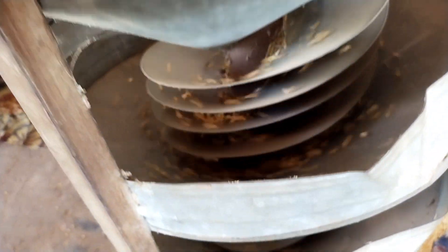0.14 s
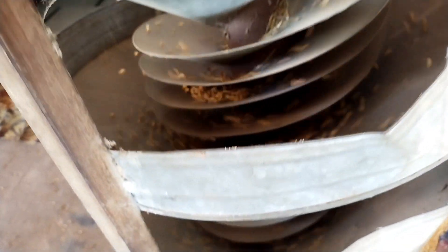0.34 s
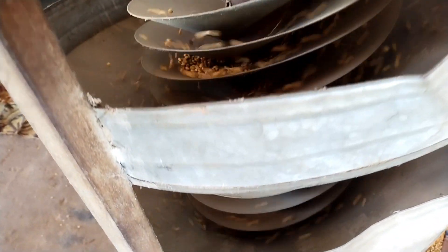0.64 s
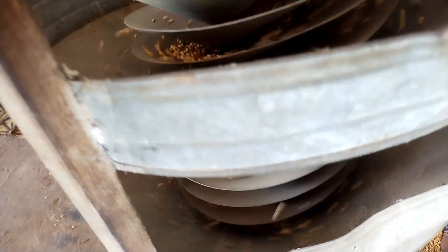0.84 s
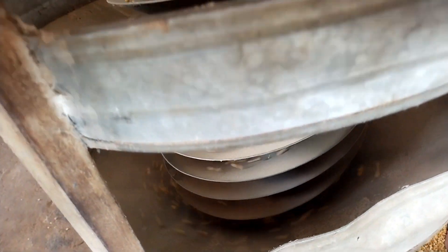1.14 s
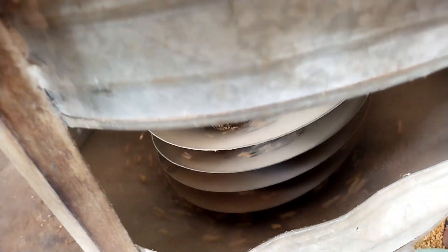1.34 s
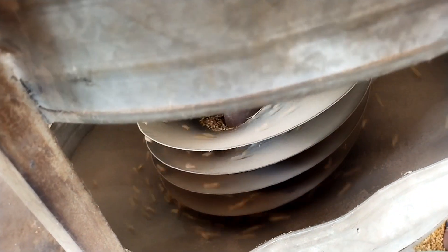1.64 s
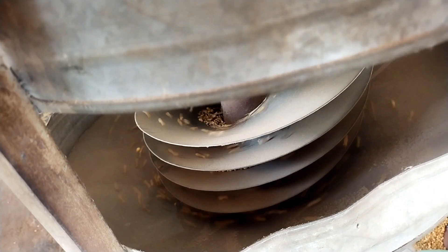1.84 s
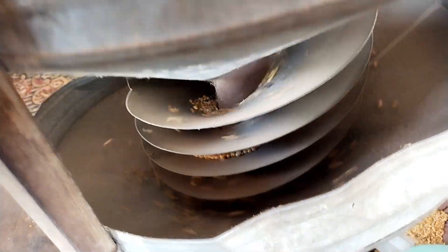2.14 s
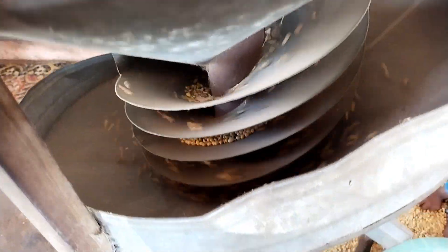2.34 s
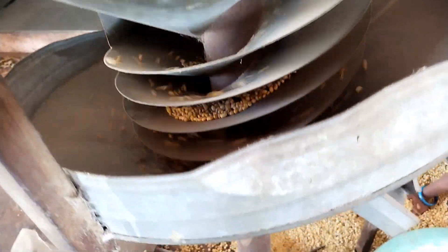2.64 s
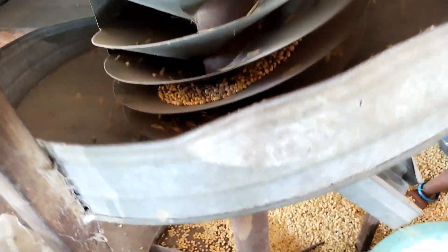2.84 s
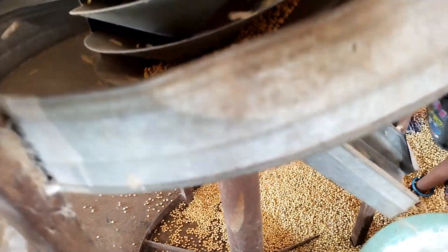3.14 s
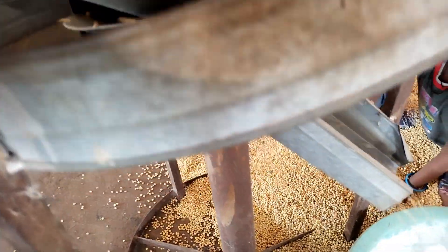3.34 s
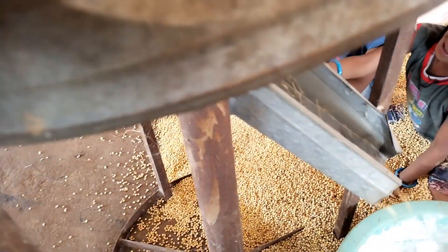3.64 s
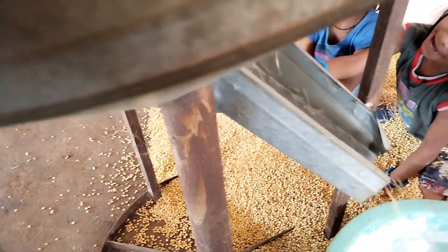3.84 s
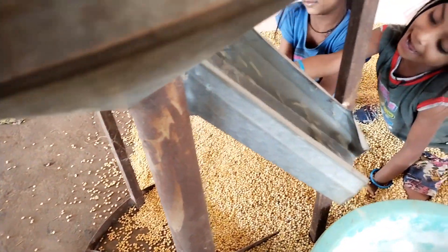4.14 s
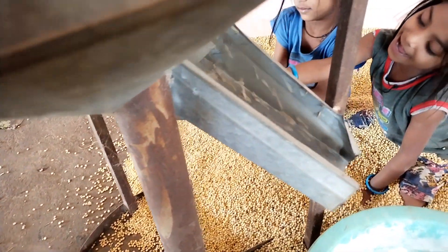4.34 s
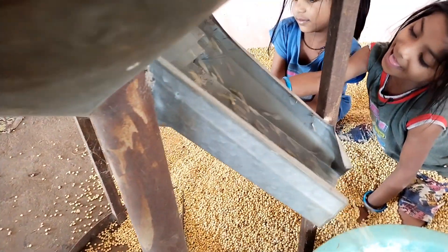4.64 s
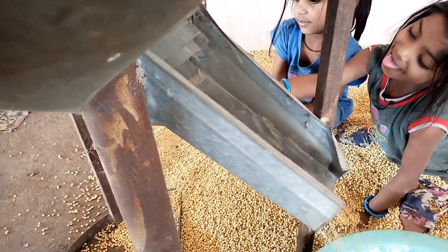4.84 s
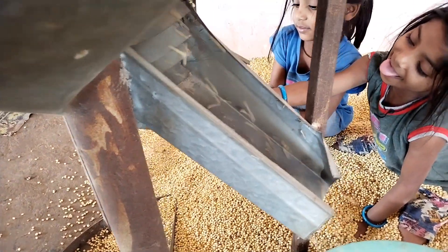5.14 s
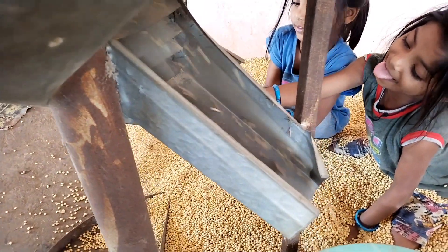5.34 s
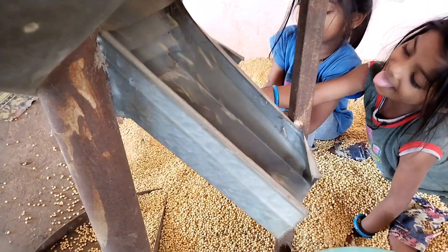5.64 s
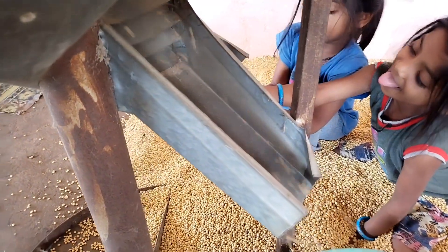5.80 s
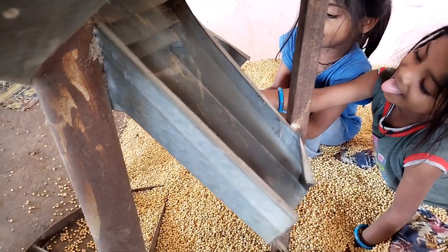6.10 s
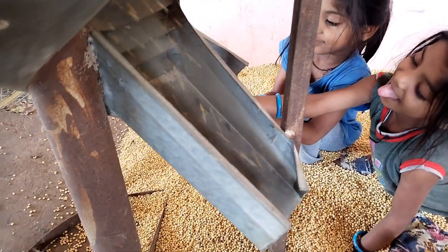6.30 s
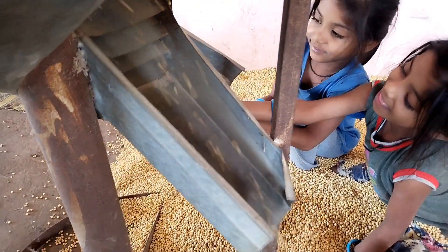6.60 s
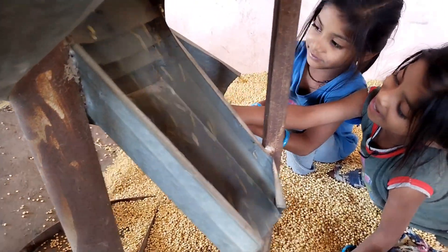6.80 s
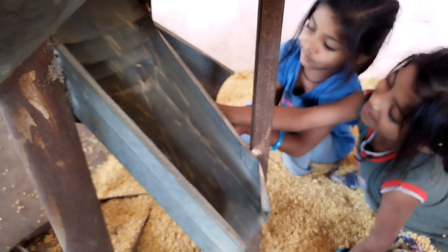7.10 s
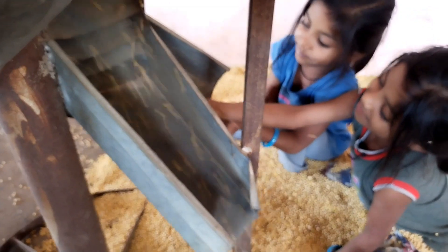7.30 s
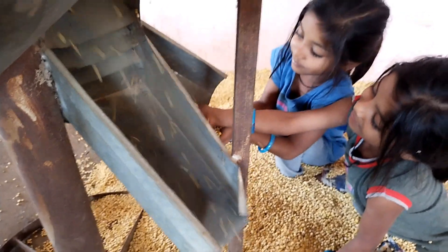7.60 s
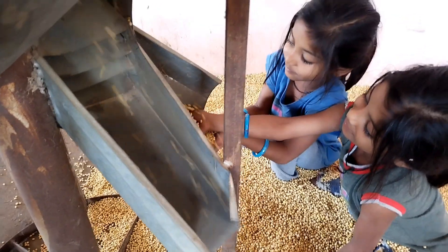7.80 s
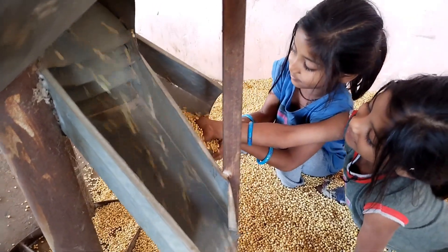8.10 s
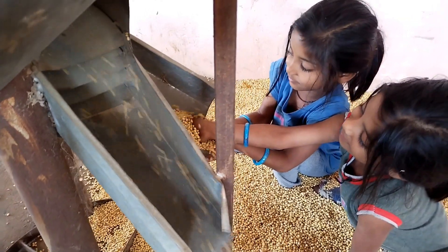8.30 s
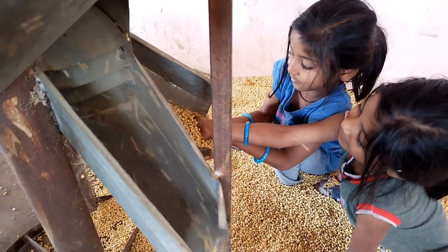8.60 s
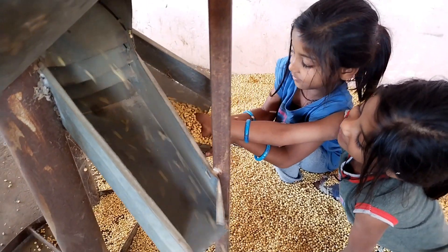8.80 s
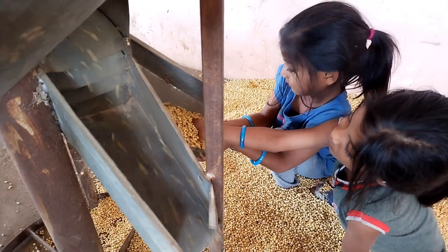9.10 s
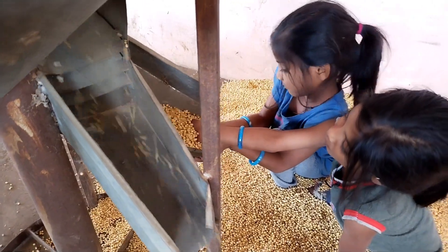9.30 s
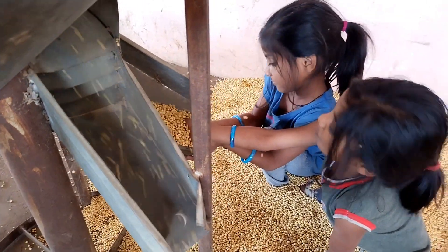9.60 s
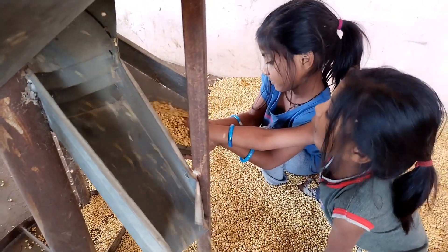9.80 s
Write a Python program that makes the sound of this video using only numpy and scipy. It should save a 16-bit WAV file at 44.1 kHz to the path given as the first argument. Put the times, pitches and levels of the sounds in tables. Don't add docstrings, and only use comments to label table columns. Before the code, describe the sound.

A constant hail of hard beans on thin metal, heard close up on a handheld phone. It starts on the spiral plates, with several isolated cracks in the first seconds, passes the more ringing drum wall with faint singing edges around the middle, and ends at the chute with a drier sliding rush. A low drum hum swells and fades beneath. The flow never stops.

```python
import sys
import numpy as np
from scipy import signal
from scipy.fft import rfft, irfft, next_fast_len
from scipy.io import wavfile
from scipy.ndimage import uniform_filter1d

SR = 44100
rng = np.random.default_rng(int(sys.argv[2]) if len(sys.argv) > 2 else 0)


def makeup_ratio(level_db):
    decades = np.asarray(level_db, float) / 20
    return 10 ** decades


def store_wav(level_fs):
    pcm = np.round(np.clip(np.atleast_2d(level_fs), -1, 1) * 32767)
    wavfile.write(sys.argv[1], SR, pcm.T.astype(np.int16))


N = 438785


def set_rms(x, db):
    return x * makeup_ratio(db) / np.sqrt(np.mean(x ** 2))


def wander(rate_hz):
    hold = int(SR / rate_hz)
    steps = np.repeat(rng.standard_normal(N // hold + 1), hold)
    return 1.3 * uniform_filter1d(uniform_filter1d(steps, hold), hold)[:N]


def curves(table):
    t_s, *columns = np.transpose(table)
    return [np.interp(np.arange(N) / SR, t_s, column) for column in columns]


def band(x, low_hz, high_hz, order=2):
    sos = signal.butter(order, [low_hz, high_hz], "band", fs=SR, output="sos")
    return signal.sosfiltfilt(sos, x)


def bean_blows(per_s, spread_db):
    lands = rng.random(N) < per_s / SR
    hardness = np.minimum(rng.exponential(size=N), 5)
    sign = np.sign(rng.random(N) - .5)
    return lands * makeup_ratio(spread_db * hardness) * sign


# f/Hz, level/dB per Hz
BEAN_COLOUR = [(25, -47.5), (130, -25.5), (190, -22), (270, -12.5), (460, -13), (900, -6), (1350, -2.5),
               (2500, -3), (2950, -5.5), (4450, -7), (4900, -11.5), (6200, -13), (9500, -24), (15500, -30)]


def sheet(resonances, per_s, t60_s, ring_db=-3, spots=10):
    size = next_fast_len(N + SR // 2)
    t = np.arange(SR // 2) / SR
    spectrum = 0
    for _ in range(spots):
        ring = rng.standard_normal(len(t)) * np.exp(-np.log(1000) * t / t60_s)
        ring *= makeup_ratio(ring_db) / np.sqrt(np.sum(ring ** 2))
        ring[0] = 1
        stream = bean_blows(per_s / spots, spread_db=1.5) * makeup_ratio(.6 * wander(14))
        spectrum = spectrum + rfft(stream, size) * rfft(ring, size)
    hz = np.maximum(np.arange(len(spectrum)) * SR / size, 1)
    colour_hz, colour_db = np.transpose(BEAN_COLOUR)
    db = np.interp(np.log(hz), np.log(colour_hz), colour_db)
    for f_hz, width_hz, lift_db in resonances:
        db = db + lift_db / (1 + (2 * (hz - f_hz) / width_hz) ** 2)
    return set_rms(irfft(spectrum * makeup_ratio(db), size)[:N], 0)


# f/Hz, width/Hz, lift/dB
SPIRAL_MODES = [(232, 44, -4.5), (300, 35, -1), (392, 34, 4.5), (618, 50, 5), (716, 60, -3), (1290, 96, 1),
                (1420, 110, 2), (1650, 160, 2), (1940, 300, -0.2), (5100, 1000, 1), (7560, 1660, 9.5),
                (8550, 1400, 1.5)]


def spiral():
    return sheet(SPIRAL_MODES, per_s=14000, t60_s=0.15)


# f/Hz, width/Hz, lift/dB
WALL_MODES = [(185, 43, -3), (235, 20, -2), (293, 56, 0.5), (391, 23, 4.5), (634, 46, 4.5), (1020, 70, -2),
              (1470, 250, 2), (1870, 180, 0.5), (2150, 180, 2), (2490, 130, 1), (7500, 1430, 10.5),
              (8300, 1100, 1.2), (14500, 1500, -2.5)]


def wall():
    return sheet(WALL_MODES, per_s=14000, t60_s=0.2)


# f/Hz, width/Hz, lift/dB
CHUTE_MODES = [(185, 43, -5), (233, 20, -7), (298, 80, 1.5), (457, 31, -1), (503, 140, 2), (830, 150, 1.5),
               (1450, 130, 3), (1700, 560, -0.5), (2250, 180, 0), (2420, 200, 0), (3460, 510, 1.2),
               (6740, 830, 3.5), (7510, 1070, 8.5), (8400, 1100, 3)]


def chute():
    return sheet(CHUTE_MODES, per_s=11000, t60_s=0.11)


# low/Hz, high/Hz
VIEW_BANDS = [
    (1100, 1800),
    (4600, 9000),
    (10000, 16000),
]
# view slope/dB per dB, spiral lift/dB, wall lift/dB, chute lift/dB
VIEW_LIFTS = [
    (.6, 0.64, .1, -.5),
    (1.1, 0.45, -0.45, 0.059),
    (1.2, -0.9, -.6, .3),
]


def through_view(rush, view_db, facing):
    lifts_db = np.array(VIEW_LIFTS) @ np.vstack([view_db, facing])
    for (low_hz, high_hz), lift_db in zip(VIEW_BANDS, lifts_db):
        gain = makeup_ratio(lift_db + .5 * wander(9))
        rush = rush + band(rush, low_hz, high_hz) * (gain - 1)
    return rush


# t/s, peak/dB, duck/dB, recovery/s
RIM_CRACKS = [
    (0.734, -3, -2.5, 0.11),
    (.878, -6, 0, .05),
    (1.214, -5, 0, .05),
    (2.40, -12, -0.9, 0.088),
    (2.502, -6, -1.0, 0.089),
]


def cracks():
    t = np.arange(N) / SR
    clicks, duck_db = np.zeros(N), np.zeros(N)
    for hit_s, peak_db, dip_db, recovery_s in RIM_CRACKS:
        after = np.maximum(t - hit_s, 0)
        started = t >= hit_s
        clicks -= started * makeup_ratio(peak_db) * np.exp(-after / .00025) * np.cos(2 * np.pi * 2200 * after)
        duck_db += started * dip_db * np.exp(-after / recovery_s)
    return band(clicks, 300, 9000), makeup_ratio(duck_db)


def wavering(hz, wander_hz, rate_hz):
    phase = 2 * np.pi * np.cumsum(hz + wander_hz * wander(rate_hz)) / SR
    return np.sqrt(2) * makeup_ratio(2.1 * wander(rate_hz)) * np.sin(phase)


# start/s, end/s, start f/Hz, end f/Hz, level/dB
EDGE_TONES = [(.5, .68, 1290, 1290, -31), (1.48, 1.66, 1206, 1215, -33), (2.797, 3.12, 1405, 1450, -33),
              (3.92, 4.13, 1374, 1373, -30), (4.24, 4.494, 1396, 1426, -28), (4.7, 4.83, 1432, 1442, -28),
              (4.932, 5.34, 1455, 1476, -28.5), (5.462, 5.62, 1480, 1500, -27),
              (4.62, 4.8, 2150, 2140, -31), (5.0, 5.2, 2130, 2150, -34), (5.55, 5.8, 2010, 2010, -35),
              (7.45, 7.598, 1520, 1540, -30)]


def singing_edge():
    t, out = np.arange(N) / SR, np.zeros(N)
    for start_s, end_s, start_hz, end_hz, db in EDGE_TONES:
        corners_s = [start_s - .03, start_s + .03, end_s - .03, end_s + .03]
        swell = np.interp(t, corners_s, [0, 1, 1, 0])
        glide_hz = np.interp(t, [start_s, end_s], [start_hz, end_hz])
        out += swell * makeup_ratio(db) * wavering(glide_hz, 2.5, 30)
    return out


# f/Hz, wander/Hz
DRUM_MODES = [(168, 9), (214, 3), (255, 5)]
# spiral/dB, wall/dB, chute/dB
DRUM_LEVELS = [(-53, -61, -59), (-56.5, -53.5, -51), (-54.5, -49, -51)]
# middle t/s, mode index, length/s, lift/dB
DRUM_SURGES = [(1.25, 0, .15, 3), (1.53, 0, 0.24, 8.5), (1.84, 0, .2, 4), (2.25, 0, .1, 2),
               (3.49, 0, .13, 7), (8.66, 0, .1, 8), (.9, 1, .2, 8), (1.7, 1, .12, 11),
               (2.876, 1, 0.48, 12.5), (3.66, 1, 0.13, 12), (3.87, 1, .16, 7), (4.49, 1, .11, 8),
               (4.7, 1, 0.14, 9), (5.0, 1, .12, 6), (5.757, 1, .12, 9), (6.94, 1, 0.19, 10.5),
               (7.43, 1, 0.35, 5), (7.79, 1, 0.31, 7), (8.22, 1, 0.19, 7), (8.6, 1, .12, 6),
               (9.0, 1, .13, 5), (9.3, 1, .11, 5), (.2, 2, .2, 8), (3.85, 2, .22, 5), (4.25, 2, .25, 6.5),
               (5.05, 2, .3, 6), (5.7, 2, .2, 9), (6.158, 2, 0.15, 10), (6.72, 2, .1, 7), (7.8, 2, .08, 8)]


def drum(facing):
    t, edge_s = np.arange(N) / SR, 0.03
    levels_db = np.array(DRUM_LEVELS) @ facing
    for middle_s, mode, length_s, lift_db in DRUM_SURGES:
        inside_s = length_s / 2 + edge_s - np.abs(t - middle_s)
        levels_db[int(round(mode))] += lift_db * np.clip(inside_s / (2 * edge_s), 0, 1)
    hum = np.zeros(N)
    for (hz, wander_hz), db in zip(DRUM_MODES, levels_db):
        hum += makeup_ratio(db - 1.0) * wavering(hz, wander_hz, rate_hz=40)
    return hum


# t/s, level/dB, clear view of falling beans/dB
PHONE_PATH = [(0, -14.5, -0.5), (.12, -16.5, .5), (.9, -15.5, -0.2), (1.4, -16, -.5), (2.1, -16, -0.5),
              (2.7, -16, -.3), (3.4, -16, -0.5), (4.0, -17, 0), (4.55, -16.5, -.5), (5.2, -17, -0.2),
              (5.9, -16.5, -0.5), (6.5, -17, -0.3), (7.2, -17, -0.5), (7.75, -16.8, -1), (8.3, -17.5, .5),
              (9.0, -17, -.5), (9.5, -17.5, .5), (9.95, -17.5, 0)]
# t/s, spiral share, wall share, chute share
PHONE_FACING = [
    (0, 1, 0, 0),
    (2.1, 1, 0, 0),
    (3.2, .2, .8, 0),
    (4.2, 0, 1, 0),
    (5.6, 0, 1, 0),
    (6.5, 0, .5, .5),
    (8, 0, 0, 1),
    (9.95, 0, 0, 1),
]


def scene():
    rush_db, view_db = curves(PHONE_PATH)
    facing = np.array(curves(PHONE_FACING))
    spiral_gain, wall_gain, chute_gain = np.sqrt(facing)
    rush = spiral_gain * spiral() + wall_gain * wall() + chute_gain * chute()
    rush = through_view(rush, view_db, facing)
    clicks, duck = cracks()
    mono = duck * (rush * makeup_ratio(rush_db) + singing_edge() + drum(facing)) + clicks
    return np.array([mono, mono])


def treble_grains(mono, count=60, hop=1024, offset=242):
    side = np.zeros(N)
    window = signal.windows.kaiser_bessel_derived(2 * hop, 4 * np.pi)
    for when, place, width, source in rng.random((count, 4)):
        at, origin = (offset + hop * int(u * (N // hop - 3)) for u in (when, source))
        low_hz = 4250 + 9300 * place
        high_hz = min(low_hz + 900 + 700 * width, 15200)
        grain = band(mono[origin:origin + 2 * hop], low_hz, high_hz, order=8)
        side[at:at + 2 * hop] += makeup_ratio(-2.5) * window * grain
    return side


def roll_off(x):
    return signal.sosfilt(signal.butter(12, 15450, fs=SR, output="sos"), x)


def record(dry):
    rounded = np.tanh(.7 * dry) / .7
    side = treble_grains(rounded[0])
    return roll_off(rounded + np.array([side, -side]))


dry = scene()
out = record(dry)
store_wav(out)
```